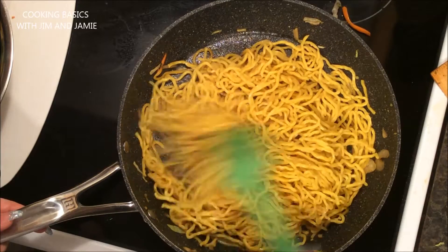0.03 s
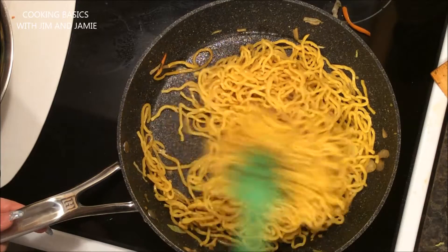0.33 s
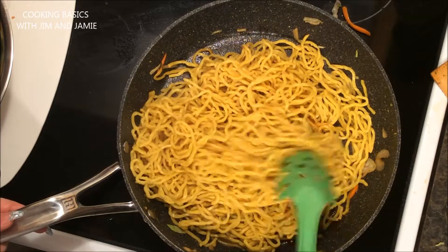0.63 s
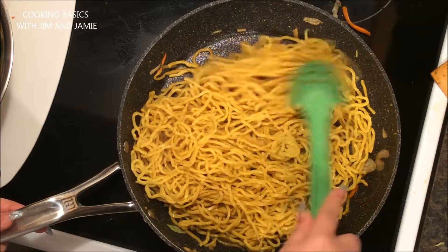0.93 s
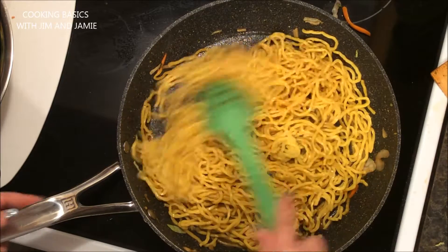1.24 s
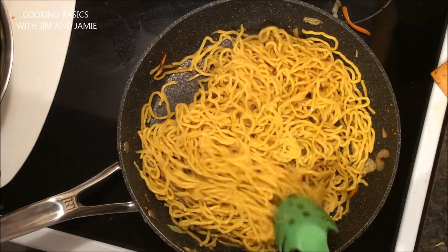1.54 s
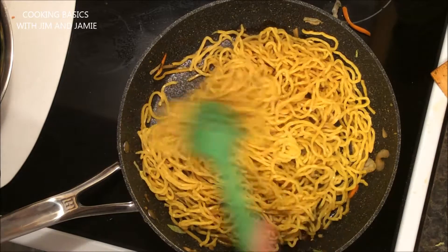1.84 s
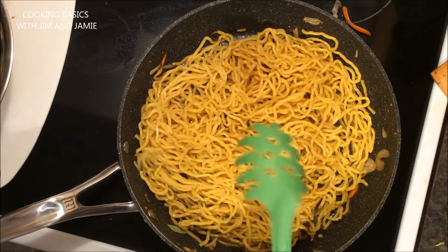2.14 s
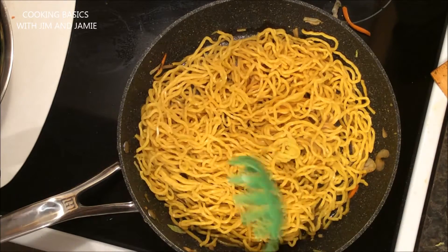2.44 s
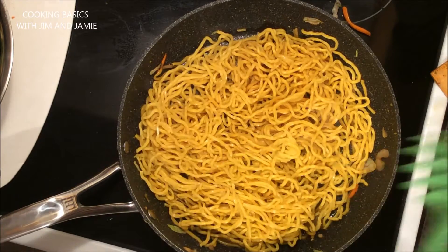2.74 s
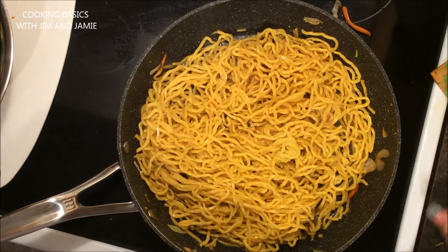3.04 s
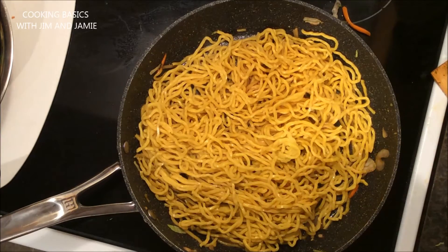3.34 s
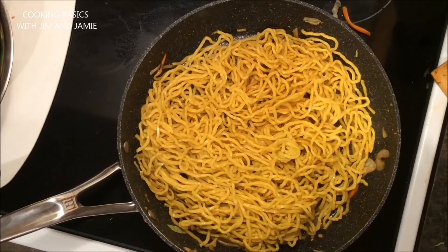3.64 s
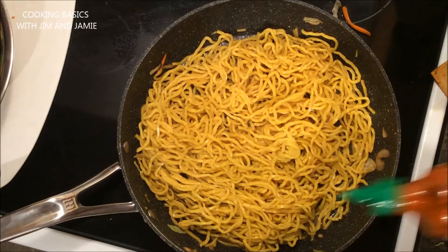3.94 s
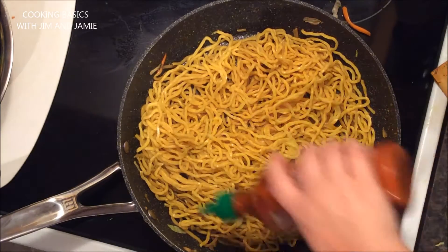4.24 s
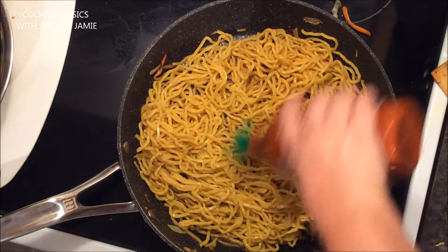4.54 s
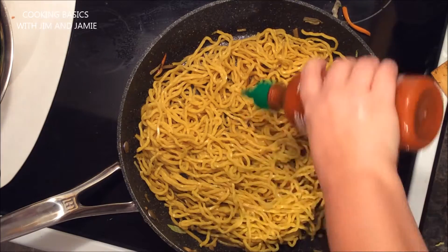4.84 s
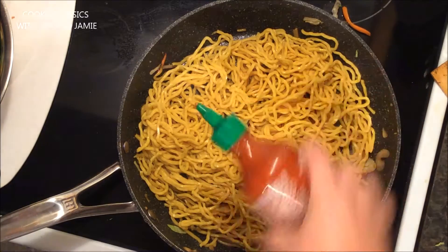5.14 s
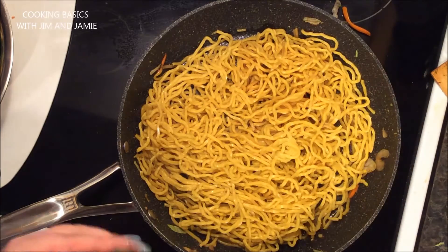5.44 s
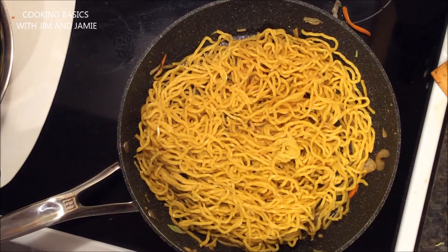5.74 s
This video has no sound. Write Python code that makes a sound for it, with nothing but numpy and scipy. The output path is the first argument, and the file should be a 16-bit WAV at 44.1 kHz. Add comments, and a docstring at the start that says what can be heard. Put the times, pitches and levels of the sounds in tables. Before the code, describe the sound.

Close over the hob in a small kitchen, a pan of noodles fries with a bright, crackling hiss above a faint deep hum. At first a plastic spatula scrapes and thuds against the pan. Two sharp knocks follow, with a slight metallic ring, and the spatula rattles briefly as it is put down. The frying carries on slightly softer, dotted with spitting droplets.

```python
"""Noodles sizzle in oil in a nonstick pan, heard from just above the hob in a small kitchen.
Bursting steam bubbles and tearing films of oil make the sizzle, over a low kitchen hum.
A plastic spatula stirs and bumps the pan, is knocked twice on the rim and is laid down with a
light clatter. Left alone, the sizzle eases a little and single water droplets spit."""
import sys
import numpy as np
from scipy import signal
from scipy.fft import rfft, irfft, next_fast_len
from scipy.io import wavfile
from scipy.ndimage import uniform_filter1d

SR = 44100
rng = np.random.default_rng(int(sys.argv[2]) if len(sys.argv) > 2 else 0)


def waveform_to_disk(signal):
    """Save audio, clipped to [-1, 1], as 16-bit WAV at the path in sys.argv[1]."""
    frames = np.transpose(np.atleast_2d(signal))
    scaled = np.clip(frames, -1, 1) * 32767
    samples = np.round(scaled).astype(np.int16)
    wavfile.write(sys.argv[1], SR, samples)


N = 259749
TIME = np.arange(N) / SR
AFTER = TIME[:SR]  # the second that follows a contact


def undb(db):
    """Turn decibels (dB) into a number to multiply a sound by."""
    return 10 ** (np.asarray(db) / 20)


def unit(x):
    """Scale a sound so that its average power is 1."""
    return x / np.sqrt(np.mean(x ** 2))


def add(out, start, x):
    """Mix x into out, beginning at start seconds."""
    i = max(int(start * SR), 0)
    out[i:i + len(x)] += x[:len(out) - i]


def fade(t60):
    """A smooth fade that falls by 60 dB in t60 seconds, the fade time."""
    return np.exp(-np.log(1000) * AFTER / t60)


def band(x, lo_hz, hi_hz, order=2):
    """Keep the pitches between two limits; a higher order cuts more sharply."""
    edges = [min(lo_hz, SR / 3), min(hi_hz, SR * 4 / 9)]
    return signal.sosfilt(signal.butter(order, edges, "band", fs=SR, output="sos"), x)


def colour(x, points):
    """Make each pitch louder or softer, following a curve of (Hz, dB) points."""
    hz, db = np.transpose(points)
    size = next_fast_len(N + SR)
    log_hz = np.log(np.maximum(np.arange(size // 2 + 1) * SR / size, 1))
    gain = undb(np.interp(log_hz, np.log(hz), db))
    # these steps make the filter ring only after a click, never before it
    cepstrum = irfft(np.log(gain), size)
    cepstrum[1:size // 2] *= 2
    cepstrum[size // 2 + 1:] = 0
    return irfft(rfft(x, size) * np.exp(rfft(cepstrum)), size)[:N]


def burst(lo_hz, hi_hz, t60):
    """Fading noise, like many close tones struck at once."""
    return unit(band(rng.standard_normal(SR), lo_hz, hi_hz)) * fade(t60)


def ring(tones):
    """The fading tones of a struck object, each given as (Hz, dB, fade time)."""
    return sum(undb(db) * fade(t60) * np.sin(2 * np.pi * hz * AFTER) for hz, db, t60 in tones)


def wander(rate):
    """A curve that glides to a new random value rate times a second."""
    step = int(SR / rate)
    stairs = np.repeat(rng.standard_normal(N // step + 1), step)
    return unit(uniform_filter1d(stairs, step)[:N])


def clicks(rate, spread_db, limit_db):
    """Random clicks, about rate a second, most of them tiny and a few large."""
    size_db = limit_db * np.tanh(spread_db * rng.exponential(size=N) / limit_db)
    return (rng.random(N) < rate / SR) * undb(size_db) * np.sign(rng.standard_normal(N))


def room(x, echo_db, t60):
    """Add the short echo from the hob, wall and cupboards."""
    tail = band(rng.standard_normal(SR), 250, 10000, order=1) * fade(t60) * (AFTER > .003)
    return x + undb(echo_db) * signal.fftconvolve(x, tail / np.sqrt(np.sum(tail ** 2)))[:N]


def kitchen_hum():
    """The kitchen hums: faint, deep, steady noise."""
    # The tone of the hum. Each row: pitch in Hz, relative level in dB.
    hum_curve = [(22, -43), (33, -24), (45, 4.5), (58, -10), (74, -16), (91, 3), (110, -6), (200, -7.5),
                 (500, -12.5), (1200, -18.5), (3000, -48)]
    return undb(-57) * unit(colour(rng.standard_normal(N), hum_curve))


def spatula_clatter():
    """The hard plastic spatula is laid down: its ends touch in turn and rattle to rest."""
    # Each row is a touch: start in seconds, tick level in dB, pitch in Hz, hollow knock level in dB.
    touches = [(3.0883, -20.5, 2530, -38), (3.0954, -20, 7140, -39.5), (3.1197, -25, 2660, -42),
               (3.1508, -16, 5000, -36), (3.171, -29.5, 2680, -42.5), (3.2216, -27, 3020, -42.5),
               (3.23, -29.5, 2870, -58), (3.241, -34.5, 2520, -44)]
    # The spatula's tones. Each row: pitch in Hz, relative level in dB, undamped fade time in seconds.
    spatula_tones = [(2340, -12, .06), (2452, 2, 0.047), (2500, -2, .07), (3009, -4.5, .07),
                     (3630, -1.5, 0.047), (4470, 0.5, 0.031), (5290, -8, 0.027), (6100, -8, .04)]
    out = np.zeros(N)
    ringing = ring(spatula_tones) * fade(t60=0.066)  # damping cuts the tones shorter
    for start, db, hz, knock_db in touches:
        # the spot that touches decides which tones ring
        tones = band(ringing, hz / 1.046, hz * 1.18, order=1)
        tick = undb(-9.5) * burst(hz / 1.25, hz * 1.7, t60=0.085) + undb(-0.5) * tones
        hollow = (undb(-5.5) * burst(422, 590, t60=0.21) + undb(-4.5) * burst(114, 330, t60=0.16)
                  + undb(-6) * burst(700, 1730, t60=0.11))
        add(out, start, undb(db) * tick + undb(knock_db) * hollow)
    return out


def pan_bumps():
    """The spatula hits the pan, or the pan drops back onto the hob: it cracks, thuds and may ring."""
    # Each row is a spatula blow or the pan bumping back: start in seconds, thud level in dB, top pitch
    # of the thud in Hz, levels of the knock, crack and rim in dB, fade time of the damping in seconds.
    bumps = [(0.088, -30, 330, -48, -34, -60, 0.6), (0.726, -35, 220, -48, -48, -56, 0.25),
             (0.978, -31, 680, -30.5, -37, -38.5, 0.085), (1.2596, -21, 328, -42, -25, -52, 0.16),
             (1.284, -25.5, 300, -48, -45, -60, 0.14), (2.372, -16, 910, -26.5, -16.5, -32.5, 8.2),
             (2.572, -11, 760, -26, -23.5, -40, 0.66)]
    # The full pan rocks on the hob. Each row: pitch in Hz, relative level in dB, fade time in seconds.
    rocking_tones = [(135.3, -6.5, 0.21), (169.7, -1.5, 0.18), (187, 1.5, .07), (228.4, -6.5, 0.42),
                     (273.7, 3, 0.2), (318, -9.5, 0.37), (372, -5, 0.28), (395, -8, 0.18),
                     (497.5, 1.5, 0.16), (549.4, -1.5, 0.14), (595, -12, 0.1), (675, -13, 0.46),
                     (710, -18, 0.19), (779, -21, 0.3)]
    # The pan wall bends and rings. The rows read the same way.
    rim_tones = [(871, 1.5, 0.91), (1037, -3, 0.31), (1084, -5.5, 0.31), (1298, -10.5, 0.6),
                 (1320, 2.5, 0.055), (2345, -3, 0.16), (3020, -24, 0.29), (3750, 1, 0.13), (4900, 4, 0.1),
                 (5150, -2, 0.12)]
    out, rim = np.zeros(N), ring(rim_tones)
    # the pan swings hardest at first, then drops back on the hob with a short second bump
    body = ring(rocking_tones) * (1 + undb(-2.5) * fade(t60=0.1))
    add(body, .012, undb(5) * ring([(288, 0, 0.031)]))
    body = undb(-14) * band(body, 135, 1540, order=6)
    for start, thud_db, top_hz, knock_db, crack_db, rim_db, damping_t60 in bumps:
        # a blow cushioned by noodles wakes only the lowest tones; the hob shudders below them
        thud = band(body, 50, top_hz) + undb(-34.5) * burst(45, 77, t60=0.86)
        knock = burst(315, 1630, t60=0.093) + undb(-9.5) * burst(420, 850, t60=0.13)
        crack = (burst(2550, 7100, t60=0.043) + undb(-26.0) * burst(3600, 4500, t60=0.11)
                 + undb(0.5) * burst(3700, 13600, t60=0.022))
        # a blade that stays against the pan cuts its ringing short
        pan = (undb(thud_db) * thud + undb(rim_db) * rim) * fade(damping_t60)
        add(out, start, pan + undb(knock_db) * knock + undb(crack_db) * crack)
    return out


def stirring():
    """The blade scrapes the pan, and the sizzle flares twice as wet noodles touch hot metal."""
    # Each row: start in seconds, length in seconds, level in dB, rough pitch in Hz.
    # The two highest in pitch are the flares.
    scrapes_and_flares = [(0.094, 0.064, -36.5, 985), (0.112, 0.056, -36, 1300), (0.119, 0.095, -34, 4300),
                          (0.318, 0.023, -36, 3300), (0.388, 0.093, -36.5, 3820), (0.707, 0.033, -45, 1350),
                          (0.951, 0.072, -30.5, 9000), (1.297, 0.061, -43, 1540),
                          (1.305, 0.066, -33.5, 8000)]
    out = np.zeros(N)
    for start, length, db, hz in scrapes_and_flares:
        crackle = clicks(rate=2500, spread_db=2.5, limit_db=16)
        rasp = unit(band(crackle, hz / 1.6, hz * 2.15))
        swell = np.hanning(int(length * SR))
        add(out, start, undb(db) * swell * rasp[:len(swell)])
    return out


def spitting_droplets():
    """Water droplets flash to steam, each with a snap, a short ping and a spray of fizz."""
    # The loudest droplets. Each row: start in seconds, snap level in dB, spray level in dB.
    loud_spits = [(0.6796, -23, -33), (1.9384, -24.5, -31), (2.081, -22, -32), (3.3886, -24, -34),
                  (3.5257, -24, -40), (3.7185, -20.5, -35), (3.8537, -18, -37), (4.036, -23, -29.5),
                  (4.6092, -21.5, -35), (4.7125, -23.5, -43), (4.9083, -22, -31), (5.0148, -23, -33),
                  (5.446, -23, -34), (5.5175, -22.5, -28.5), (5.5772, -26, -33), (5.7212, -23, -37),
                  (5.8361, -23, -37)]
    out = np.zeros(N)
    starts = np.cumsum(rng.exponential(size=40)) / 4  # smaller ones, about four a second
    sizes_db = 2.5 * rng.standard_normal(size=40)
    small_spits = zip(starts, sizes_db - 29, sizes_db - 38)
    for start, snap_db, spray_db in [*loud_spits, *small_spits]:
        ping_hz = 10800 * 2 ** (0.215 * rng.standard_normal())  # scattered by about 1/5 octave
        snap = undb(3.5) * ring([(ping_hz, 0, .004)]) + undb(1) * burst(3400, 21000, t60=0.0049)
        spray = burst(4200, 20000, t60=.11)
        if start < N / SR:
            add(out, start, undb(snap_db) * snap + undb(spray_db) * spray)
    return out


def sizzle():
    """Steam bubbles burst in the hot oil in flurries, each with a tiny ping."""
    # The tone of the sizzle. Each row: pitch in Hz, relative level in dB.
    sizzle_curve = [(150, -32), (300, -23.5), (600, -14.5), (950, -16.5), (1450, -9), (1900, -12),
                    (2500, -8.5), (3600, -4), (4800, -2.5), (6600, -1.5), (9200, 3.1), (11000, 3),
                    (15000, 3)]
    # How briskly the noodles fry. Each row: time in seconds, base level in dB.
    frying_levels = [(0.0, -34.5), (0.61, -35.5), (0.69, -36), (2.05, -36), (2.2, -37), (3.07, -35.5),
                     (3.56, -37), (3.89, -36), (4.15, -37.5), (4.5, -38.5), (5.41, -38), (5.89, -38.5)]
    pops = np.zeros(N)
    flurry = wander(60)
    for hz in np.linspace(1500, 15000, 10):
        bubbles = clicks(rate=240 * undb(2 * wander(30) + 2 * flurry), spread_db=6.5, limit_db=28)
        pops += band(bubbles, max(hz - 1100, 500), hz + 1100, order=1)
    # oil films tear with a bright tick, and each throws up a brief fizzing spray
    tears = clicks(rate=600, spread_db=7, limit_db=25)
    ticks = unit(band(tears, 2200, 18000, order=1))
    spray_power = np.abs(signal.fftconvolve(ticks ** 2, fade(t60=0.046))[:N])
    spray = np.sqrt(spray_power) * rng.standard_normal(N)
    steam = rng.standard_normal(N)
    fry = colour(unit(pops) + undb(-7.5) * ticks + undb(1) * unit(spray) + undb(5) * steam, sizzle_curve)
    fry *= undb(0.61 * wander(26) + .5 * wander(140))  # the level flickers
    # large wet bubbles lie below 6200 Hz, the fine oil fizz above
    wet = signal.sosfiltfilt(signal.butter(2, 6200, fs=SR, output="sos"), fry)
    fizz = fry - wet
    briskness = undb(np.interp(TIME, *np.transpose(frying_levels)))
    return briskness * (undb(1) * unit(fizz) + undb(-6) * unit(wet))


def scene():
    """Mix the hum, the frying and the handling of the pan into one channel."""
    hum = kitchen_hum()
    frying = room(sizzle() + spitting_droplets(), echo_db=-16.5, t60=0.27)
    handling = room(stirring() + pan_bumps() + spatula_clatter(), echo_db=-10, t60=0.34)
    return (frying + handling + hum)[None]


def record(dry):
    """Cut off the highest treble, above 15550 Hz."""
    return signal.sosfilt(signal.ellip(12, .1, 80, 15550, fs=SR, output="sos"), dry)


dry = scene()
out = record(dry)
waveform_to_disk(out)
```